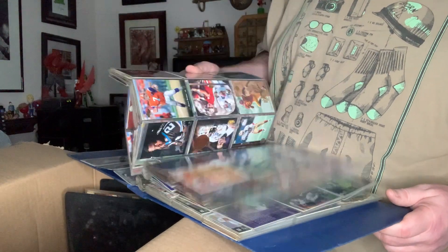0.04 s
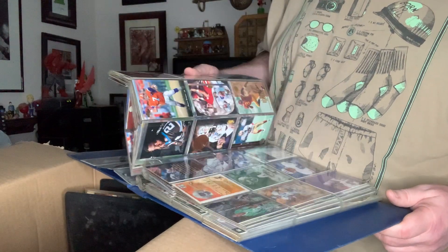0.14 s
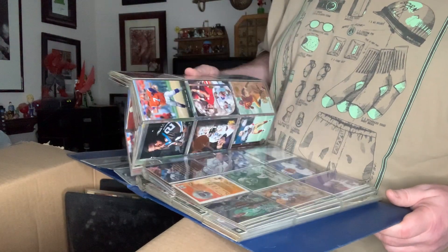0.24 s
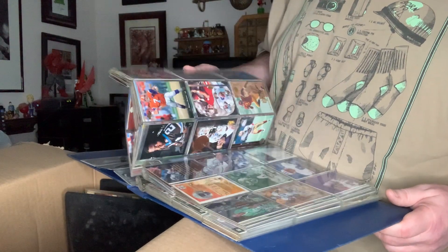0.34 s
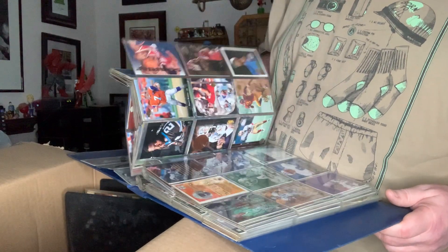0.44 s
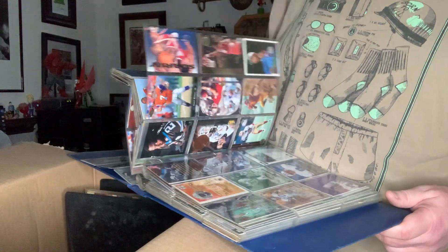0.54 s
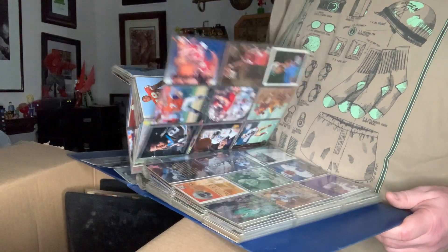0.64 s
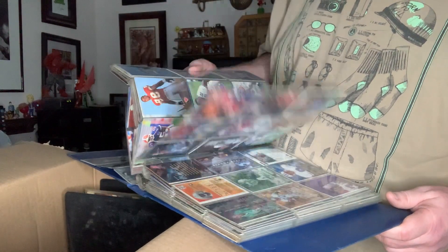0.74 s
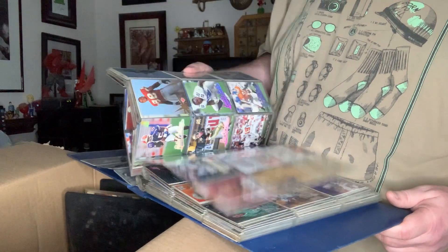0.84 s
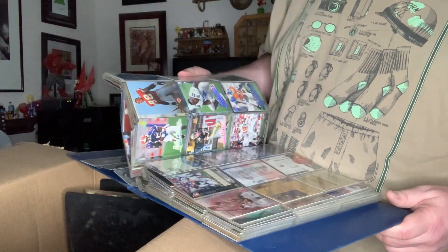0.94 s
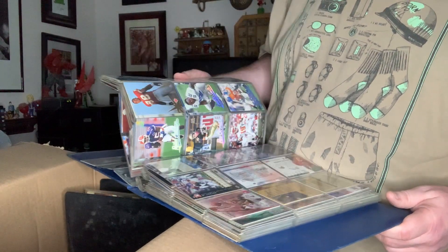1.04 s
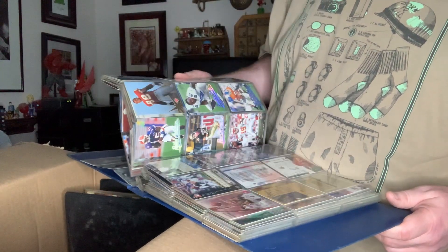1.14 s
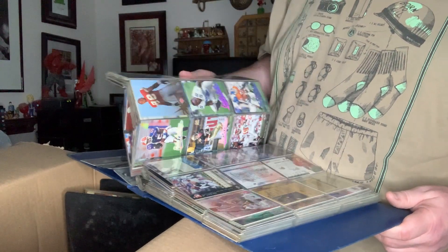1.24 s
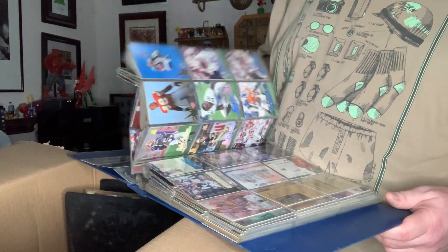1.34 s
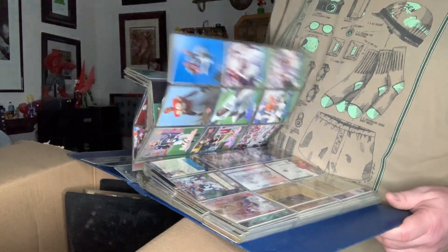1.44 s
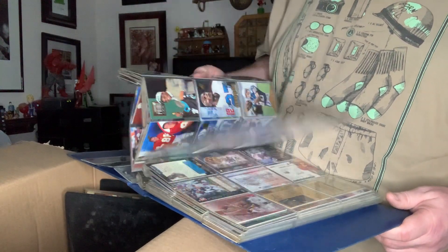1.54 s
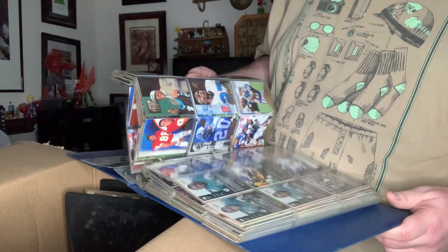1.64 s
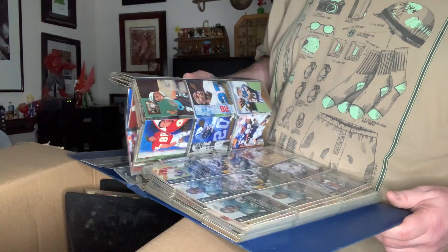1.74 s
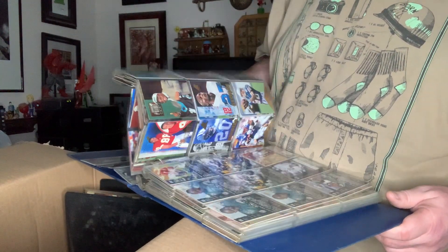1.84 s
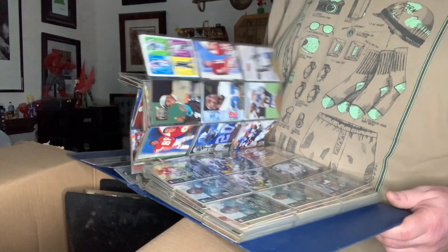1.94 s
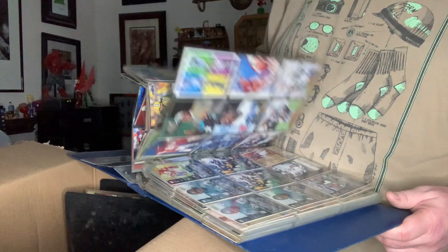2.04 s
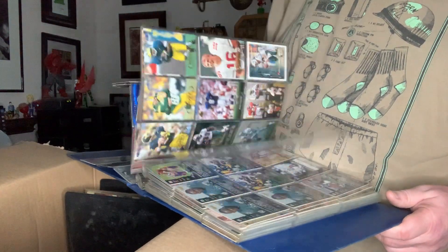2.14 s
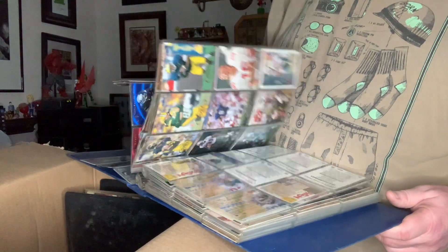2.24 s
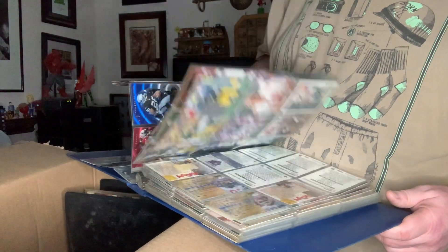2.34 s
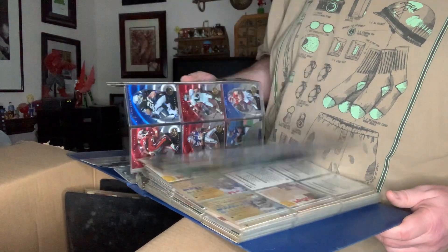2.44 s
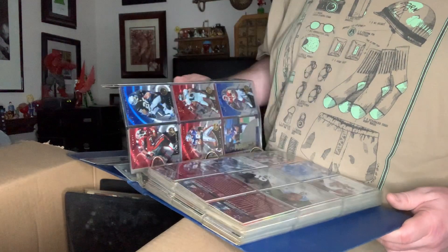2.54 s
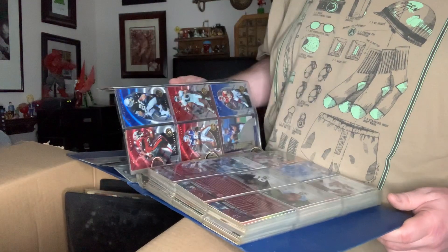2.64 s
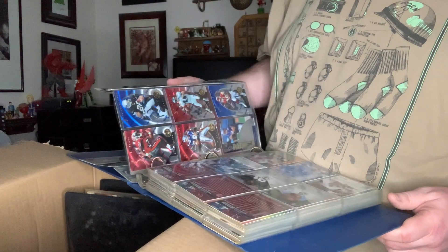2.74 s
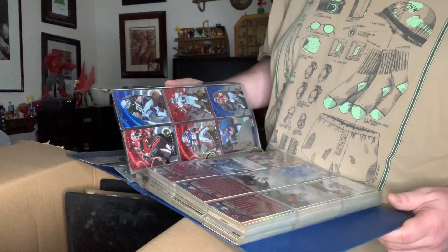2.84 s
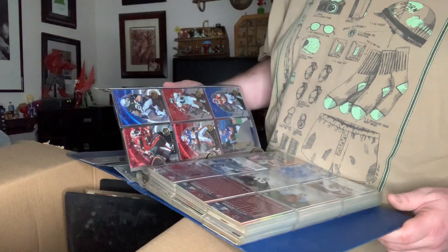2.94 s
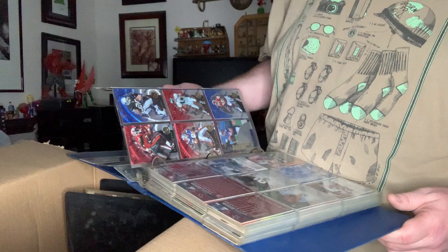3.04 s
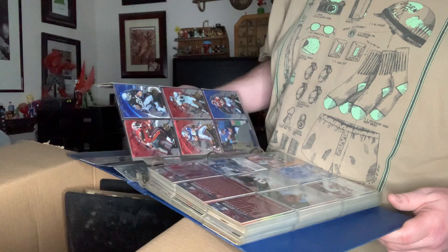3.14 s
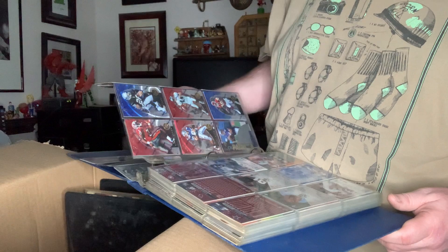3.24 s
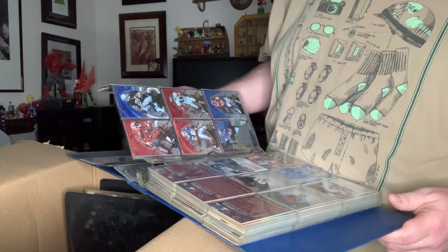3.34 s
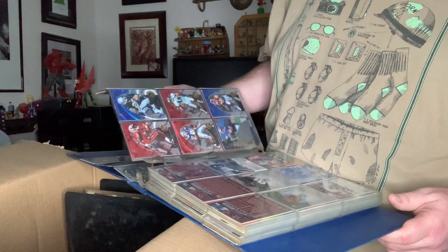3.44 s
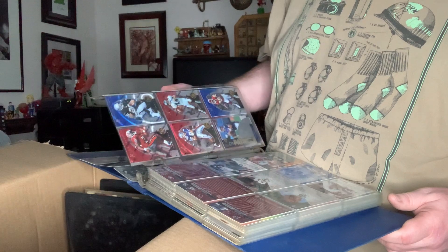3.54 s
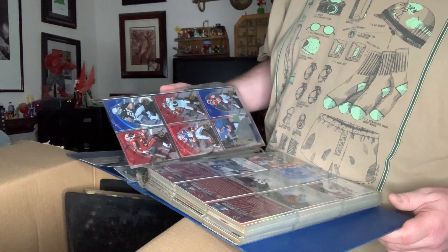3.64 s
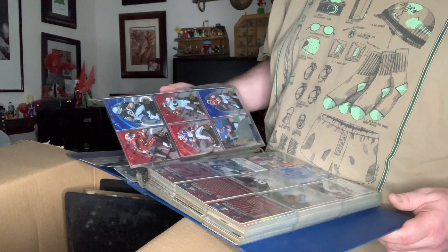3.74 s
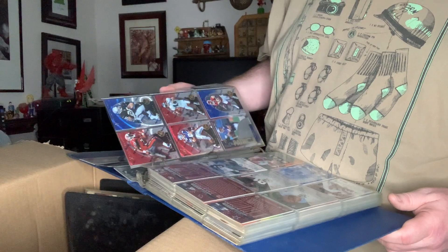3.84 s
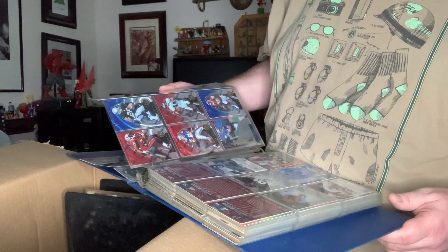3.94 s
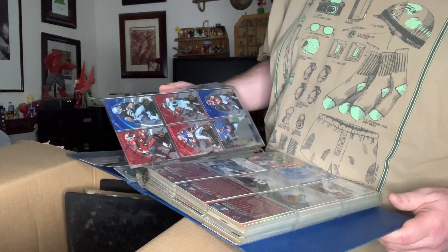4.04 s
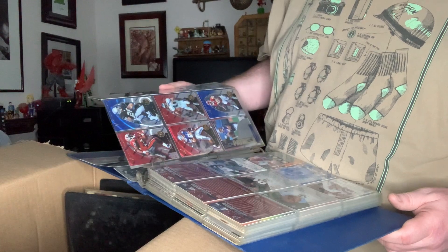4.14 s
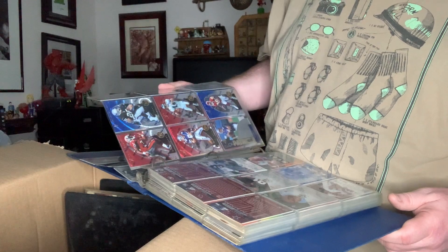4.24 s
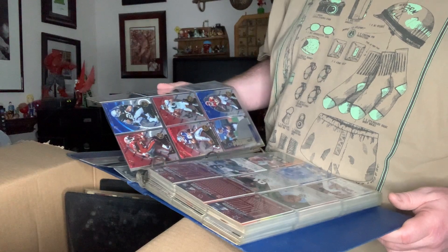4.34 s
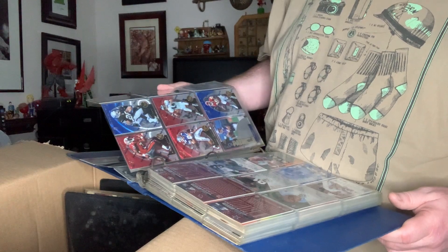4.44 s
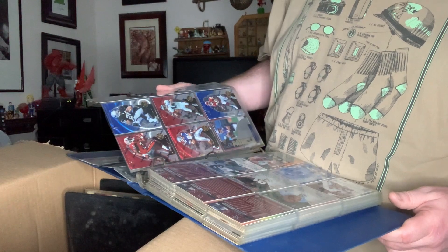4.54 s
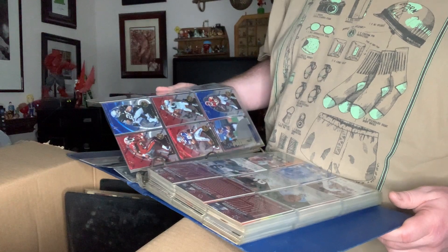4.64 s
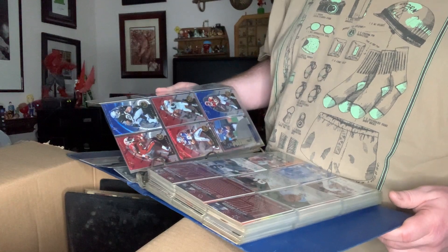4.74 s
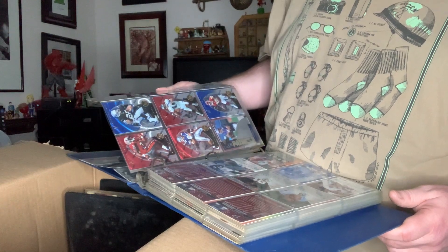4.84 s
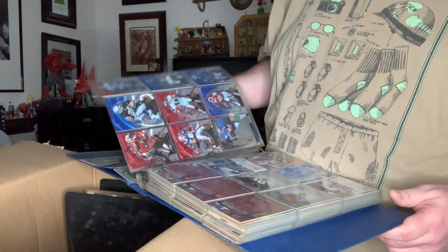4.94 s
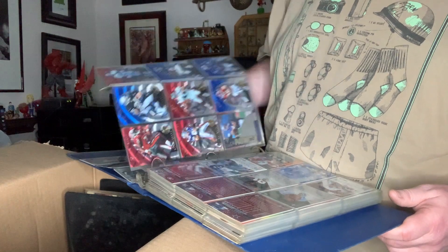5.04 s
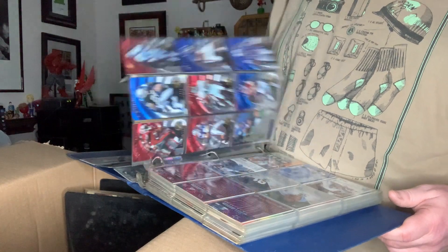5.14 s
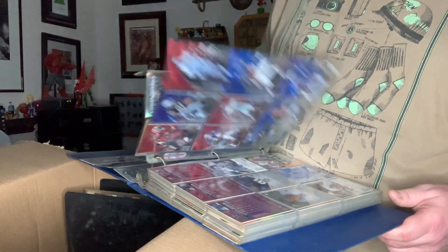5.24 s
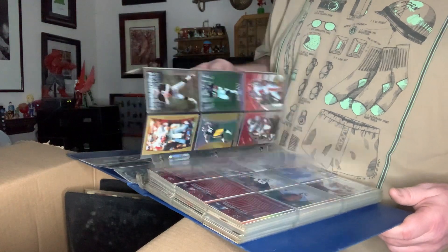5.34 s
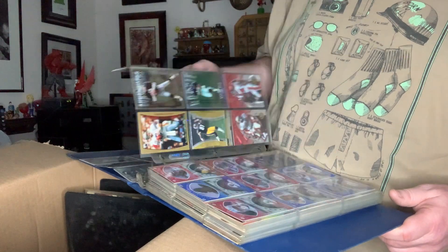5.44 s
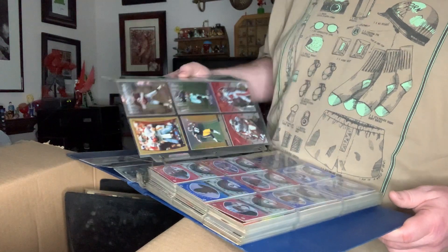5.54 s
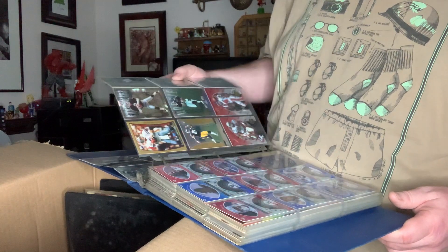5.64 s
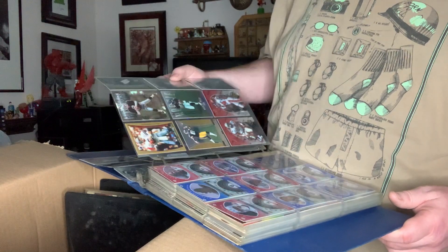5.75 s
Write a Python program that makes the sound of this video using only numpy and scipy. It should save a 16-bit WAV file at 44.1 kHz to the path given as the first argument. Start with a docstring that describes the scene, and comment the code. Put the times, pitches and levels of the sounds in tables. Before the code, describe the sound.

Close-up binder pages flipped in bursts: slippery plastic rustle, sharp card snaps, dull slaps, a quiet pause, then the hardest slap.

```python
"""A burst of sliding plastic and a hard card snap open the scene, then a soft slap and a puff of air.
Card-sleeve pages are being turned in a ring binder on a lap, in a small quiet room: stick-slip noise
rustles, struck modes snap, sinking sines slap, two wavering tones squeak and slow noise puffs.
A heavy slap comes near the end. Quick echoes, a short room tail and low house air lie around it.
A phone with two ports stands close by and gives the stereo picture."""
import sys
import numpy as np
from scipy import signal
from scipy.fft import rfft, irfft, next_fast_len
from scipy.io import wavfile
from scipy.ndimage import uniform_filter1d

SR = 44100
rng = np.random.default_rng(int(sys.argv[2]) if len(sys.argv) > 2 else 0)


def put_to_file(sound):
    """Save the sound as 16-bit audio at rate SR, in the file named by the first command-line argument."""
    columns = np.atleast_2d(sound).T  # one column per channel
    safe = np.clip(columns, -1, 1)
    whole_steps = np.round(safe * 32767)
    wavfile.write(sys.argv[1], SR, whole_steps.astype(np.int16))


N = 254898
TIME = np.arange(N) / SR
SIZE = next_fast_len(N + SR)  # room for tails beyond the end
FREQ = np.maximum(np.fft.rfftfreq(SIZE, 1 / SR), 1)

# A page is peeled up and slides ever harder: start t/s, length t/s, final rubbing level/dB,
# final crinkle level/dB
LIFTS = [(0.707, .14, -65.5, -77), (1.258, 0.38, -56, -54), (2.291, 0.23, -47, -49),
         (2.889, .19, -67.5, -72.5), (4.958, .41, -51, -50)]
# A page is gripped, bent or laid down: start t/s, hold t/s, rubbing level/dB, crinkle level/dB
FLEXES = [(0, 0.071, -39.5, -45), (0.063, .01, -39, -36.5), (0.342, 0.024, -68.5, -61),
          (0.396, 0.35, -70.5, -77.5), (0.846, 0.028, -46, -49.5), (.89, 0.13, -53, -69.5),
          (1.24, 0.085, -63, -70), (1.32, 0.02, -54, -50), (1.467, 0.038, -51.5, -80),
          (1.581, 0.089, -43, -42.5), (1.839, 0.28, -72, -69), (2.057, 0.039, -52, -56.5),
          (2.113, 0.03, -43, -44.5), (2.178, 0.093, -45.5, -43), (2.326, 0.014, -47, -58),
          (2.524, 0.083, -46, -51), (2.715, 0.12, -80, -72.5), (3.066, 0.017, -47.5, -47),
          (3.104, 0.097, -58.5, -64), (3.379, .125, -60.5, -55.5), (3.552, 0.053, -54, -52.5),
          (4.203, .025, -76.5, -66.5), (4.72, 0.137, -89.5, -80), (4.871, 0.1, -81, -68.5),
          (5.127, 0.072, -53, -51.5), (5.261, 0.011, -48, -48), (5.403, 0.034, -41.5, -51.5),
          (5.457, 0.3, -64.5, -74), (5.66, 0.043, -63, -75)]
LIFT_GROWTH_DB_PER_S = 41.5
ATTACK_S, SAG_DB_PER_S, RELEASE_DB_PER_S = 0.0082, 32, 328
# Hollow of the moving page, high when bent tight, low when slack: t/s, f/Hz
BEND = [(.05, 1710), (.45, 1625), (.87, 886), (1.6, 1426), (2.3, 1245), (2.6, 990), (3.1, 632),
        (3.57, 1244), (5.4, 1197)]
# Colour of sheets rubbing: f/Hz, level/dB
RUB_COLOUR = [(100, -10), (180, -2), (400, -7), (650, 0), (1000, -6.5), (1500, -4), (2100, -6),
              (2600, -17.5), (5000, -31.5)]
# Colour of the crinkling film: f/Hz, level/dB
CRINKLE_COLOUR = [(1000, -22.5), (2000, -5), (2700, 0), (3500, -0.5), (4700, 1), (6300, -1), (7600, -3.5),
                  (9000, 5), (10500, -15.5), (12000, 0), (15500, -2)]

# Cards and sleeve edges snapping or slapping down: t/s, card level/dB, crack level/dB
SNAPS = [(0.0533, -24.5, -24.5), (0.0808, -39, -39), (0.3503, -64, -60), (0.4507, -62.5, -79),
         (.8634, -42.5, -36.5), (.87, -41.5, -42), (1.381, -51.5, -48.5), (1.4065, -54.5, -53),
         (1.462, -46, -41.5), (1.5137, -46, -50.5), (1.6055, -40.5, -41.5), (1.9571, -62, -64.5),
         (2.1116, -44.5, -47), (2.1254, -50, -38), (2.2283, -39, -43), (2.3283, -46, -59),
         (2.341, -44, -42.5), (2.4625, -47, -38.5), (2.5088, -39.5, -40), (2.5133, -42, -31.5),
         (2.5579, -45, -50), (2.7222, -70, -60.5), (3.0744, -51, -52.5), (3.118, -50, -54),
         (3.4232, -42, -48), (5.0325, -61.5, -52.5), (5.1932, -48, -42.5), (5.344, -43.5, -48.5),
         (5.3737, -32.5, -35.5), (5.409, -20.5, -29.5), (5.693, -56.5, -67)]
# Colour of a crack: f/Hz, level/dB
CRACK_COLOUR = [(900, -21.5), (2000, -5), (4300, 8), (6500, -2), (9000, 6), (14000, -3.5), (16000, -5)]
# A row of cards lands one after another
PATTER_S, PATTER_GAP_S, PATTER_CARD_DB, PATTER_CRACK_DB = 2.596, 0.0097, -41, -67.5
# Stray ticks of a moving page, levels against its rubbing and crinkle
TICKS_PER_S, TICK_CARD_DB, TICK_CRACK_DB, TICK_SCATTER_DB = 22, -1, -3, 1

# Soft blows on the stack of pages: t/s, pitch f/Hz, 60 dB fade t/s, peak level/dB
THUDS = [(.085, 245, 0.07, -41.5), (0.872, 564, 0.037, -44.5), (2.523, 320, 0.014, -20.5),
         (2.529, 196, 0.058, -38), (3.075, 603, 0.076, -39), (3.088, 169, .08, -46),
         (3.42, 947, 0.024, -45), (3.437, 150, 0.07, -44.5), (5.381, 1196, 0.038, -31),
         (5.4097, 607, 0.0077, -15.5), (5.412, 216, 0.033, -31)]
# Smooth sleeves gliding over each other: crest t/s, crest to 1/e t/s, crest level/dB
GLIDES = [(.025, .035, -41.5), (0.477, 0.059, -70.5), (0.608, 0.075, -65), (.93, 0.079, -59.5),
          (2.24, 0.056, -55.5), (4.0, 0.033, -77)]
# Fingertips landing on a sleeve: t/s, level/dB
TOUCHES = [(1.857, -55), (2.07, -50.5), (3.554, -48), (4.091, -59.5), (4.2, -65)]
# A fingertip dragging on the sleeve: t/s, slip rate f/Hz, level/dB
SQUEAK = [(3.375, 2305, -71.5), (3.40, 2170, -52), (3.45, 2190, -62), (3.505, 2044, -53), (3.52, 2120, -61),
          (3.55, 2140, -77)]
# Air pushed out from under a moving page: crest t/s, crest to 1/e t/s, crest level/dB
PUFFS = [(.098, 0.037, -47), (1.655, 0.028, -54), (2.18, 0.038, -53.5), (2.543, 0.05, -58.5),
         (2.61, 0.071, -52.5), (5.476, 0.013, -42)]

# Colour of the room's tail: f/Hz, level/dB
ROOM_COLOUR = [(60, -1), (200, -3), (1500, -3.5), (4000, 4.5), (15000, -11)]
# Fade of the room's tail: f/Hz, 60 dB fade t/s
ROOM_DECAY = [(100, 0.35), (1200, 0.29), (4500, 0.34), (14000, 0.28)]
# Colour of the house air: f/Hz, level/dB
HUSH_COLOUR = [(45, -1.5), (140, 1.5), (250, -7.5), (450, -17.5), (1000, -24.5), (4600, -33.5), (7000, -34),
               (15500, -44)]
HUSH_DB = -67

# Right port against the left: f/Hz, level/dB
RIGHT_PORT = [(60, 4.5), (300, 4), (600, 3), (900, 1), (7800, -1.5), (8080, 13.5), (9000, -1)]
# Phase by which the left port trails (below zero it leads): f/Hz, phase/turns
LEFT_TRAIL = [(3400, 0), (5300, -.35), (6200, 0), (7200, .6), (8100, 1.02), (10600, 1.5), (12800, 2),
              (15500, 2.5)]
TOP_HZ = 15400


def effort(start_s, length_s, slope_db_per_s):
    """Gain of one move of the hand: quick attack, a hold that grows or sags, then release."""
    t = np.maximum(TIME - start_s, 0)
    hold_db = slope_db_per_s * np.minimum(t, length_s)
    release_db = RELEASE_DB_PER_S * np.clip(t - length_s, 0, .5)
    return np.minimum(t / ATTACK_S, 1) * undb(hold_db - release_db)


def handling():
    """Gains of rubbing and crinkle: lifts swell to their end, flexes start strong and relax."""
    power = 1e-12  # never quite zero, so its level in dB exists
    for start_s, length_s, *final_db in LIFTS:
        start_db = np.array(final_db) - LIFT_GROWTH_DB_PER_S * length_s
        power = power + np.outer(undb(start_db), effort(start_s, length_s, LIFT_GROWTH_DB_PER_S)) ** 2
    for start_s, hold_s, *start_db in FLEXES:
        power = power + np.outer(undb(start_db), effort(start_s, hold_s, -SAG_DB_PER_S)) ** 2
    return np.sqrt(power)


def rustle(rubbing, crinkle):
    """Sheets rub with the hollow sound of the cards inside; the thin film crinkles above."""
    load = catches(rate=150, fade_s=0.0076, depth_db=8.0)
    rub_slips = slips(rate=2500, scatter_db=0.5, width=.45)
    rub = sheet(rub_slips, RUB_COLOUR, load, np.geomspace(420, 2800, len(load)),
                steady=0.054, drift_db=3.5, hollow_db=3)
    film_slips = slips(rate=7000, scatter_db=2, width=0.93)
    film = sheet(film_slips, CRINKLE_COLOUR, load, np.geomspace(1800, 14000, len(load)),
                 steady=0.73, drift_db=6.0, hollow_db=0.5)
    return rub * rubbing + film * crinkle


def slips(rate, scatter_db, width):
    """Tiny stick-slip releases: many faint, a few sharp, each from its own spot on the sheet."""
    sizes = undb(scatter_db * np.minimum(rng.exponential(size=N), 4))  # no release is without bound
    struck = rng.random(N) < rate / SR
    train = unit(struck * sizes * rng.choice([-1, 1], N))
    return spread(train, train * rng.standard_normal(N), width)


def catches(rate, fade_s, depth_db, count=12):
    """Force on each patch of a sheet: sudden catches load the patches unequally, then let go."""
    at = np.flatnonzero(rng.random(N) < rate / SR)
    chance = rng.standard_normal((len(at), count + 1))
    kick_db = depth_db * (chance[:, :1] + chance[:, 1:])  # shared chance plus each patch's own
    kicks = np.zeros((count, N))
    kicks[:, at] = undb(np.clip(kick_db, -20, 10)).T ** 2
    load = signal.lfilter([1], [1, -np.exp(-1 / (fade_s * SR))], kicks)
    return load / load.mean(axis=1, keepdims=True)


def sheet(train, colour, load, centres_hz, steady, drift_db, hollow_db):
    """Slips sound through the resonances of a bending sheet, each swelling with its patch's load."""
    spectrum = rfft(train, SIZE) * undb(read(colour))
    place = np.interp(np.log(FREQ), np.log(centres_hz), np.arange(len(centres_hz)))
    hollow_hz, = curves(BEND)
    out = 0
    for k, hz in enumerate(centres_hz):
        overlap = np.maximum(1 - np.abs(place - k), 0)  # neighbouring bands crossfade
        band = irfft(spectrum * overlap, SIZE)[:, :N]
        hollow = np.exp(-(2 * np.log2(hz / hollow_hz)) ** 2)
        swell_db = drift_db * walk(35) + hollow_db * hollow
        out = out + band * np.sqrt(abs(steady) + load[k]) * undb(swell_db)
    return unit(out)


def releases(rubbing, crinkle, detune_octaves=.3, count=3):
    """Rows (s, Hz, card dB, crack dB) of snaps, patter and ticks; pitch follows the page's bend."""
    hollow_hz, = curves(BEND)
    patter = [(PATTER_S + k * PATTER_GAP_S, PATTER_CARD_DB, PATTER_CRACK_DB) for k in range(count)]
    rows = [(s, hollow_hz[int(s * SR)], card_db, crack_db) for s, card_db, crack_db in SNAPS + patter]
    draw = rng.random(N)
    detune, size = rng.standard_normal((2, N))
    for i in np.flatnonzero(draw < TICKS_PER_S / SR):
        motion_db = 20 * np.log10([rubbing[i], crinkle[i]])
        card_db, crack_db = motion_db + TICK_SCATTER_DB * size[i]
        hz = hollow_hz[i] * 2 ** (detune_octaves * detune[i])
        rows.append((i / SR, hz, card_db + TICK_CARD_DB, crack_db + TICK_CRACK_DB))
    return rows


def snaps(rows, card_q=3.2, ring_q=14, ring_db=-4, overtone=1.62, overtone_db=-3, bend_s=0.00057,
          crack_s=.0006, creak_s=0.0068, creak_db=-18, scatter=2.4, width=0.21, size=2048):
    """The film creaks, lets go with a crack, and a bending wave rings two modes of the card."""
    lead_s, span_s = .008, .004  # creak ahead of the snap; span over which its rms level counts
    out = np.zeros((2, N))
    t = np.arange(size) / SR - lead_s
    freq = np.maximum(np.fft.rfftfreq(size, 1 / SR), 1)
    # bending waves are slower in the bass
    delay_turns = freq * (lead_s - bend_s) + 2 * bend_s * np.sqrt(freq * 1e3)
    travel = np.exp(-2j * np.pi * delay_turns)
    creak = undb(creak_db) * np.exp(-np.abs(t) / creak_s)
    shape = np.where(t < 0, creak, np.exp(-np.abs(t) / crack_s))
    tick = unit(signal.unit_impulse(size, int(lead_s * SR) + 1))
    for s, hz, card_db, crack_db in rows:
        modes = resonance(hz, card_q, freq)
        modes = modes + undb(overtone_db) * resonance(overtone * hz, 2 * card_q, freq)
        modes = modes + undb(ring_db) * resonance(hz, ring_q, freq)  # the card's free part rings on
        card = irfft(modes / (1 + 1j * freq / (2 * hz)) ** 2 * travel)
        noise = spread(*rng.standard_normal((2, size)) * shape, width)
        burst = scatter * unit(noise) + tick
        crack = irfft(rfft(burst) * undb(read(CRACK_COLOUR, freq)))
        snap = unit(card) * undb(card_db) + unit(crack) * undb(crack_db)
        add(out, s - lead_s, snap * np.sqrt(span_s * SR / size))
    return out


def thuds(rise_s, sag):
    """The stack gives under a blow and rings for a few cycles, sinking in pitch."""
    out = np.zeros(N)
    t = np.arange(SR // 4) / SR
    for s, hz, t60, db in THUDS:
        fade = undb(-60 * t / t60)
        phase = np.cumsum(hz * (1 + sag * (fade - .5))) / SR
        ring = np.sin(2 * np.pi * phase) * fade * (1 - np.exp(-t / rise_s))
        add(out, s, ring / np.abs(ring).max() * undb(db))
    return out


def glides(centre_hz=3500, q=.8):
    """Plastic sliding without catching gives an airy hiss."""
    hiss = spread(*rng.standard_normal((2, N)), 0.17)
    return unit(filtered(hiss, resonance(centre_hz, q) ** 2)) * swells(GLIDES)


def touches(card_hz=1170, upper_hz=2020, q=7, fade_s=0.0092, film_db=-4):
    """A soft fingertip crushes the film for a moment and makes the card inside buzz."""
    press = sum(undb(db) * (TIME >= s) * np.exp(-np.abs(TIME - s) / fade_s) for s, db in TOUCHES)
    grit = spread(*rng.standard_normal((2, N)), 0.63)
    card = unit(filtered(grit, resonance(card_hz, q) + resonance(upper_hz, q) / 2))
    film = unit(filtered(grit, undb(read(CRINKLE_COLOUR))))
    return (card + undb(film_db) * film) * press


def squeak(jitter=0.16, wander=.09, upper_ratio=1.42, upper_db=-6):
    """Uneven slips under the fingertip sing in two rough bands."""
    hz, db = curves(SQUEAK)

    def band(ratio):
        """One tone with its own uneven pitch."""
        uneven = 1 + jitter * walk(900) + wander * walk(70)
        return np.sin(2 * np.pi * np.cumsum(hz * ratio * uneven) / SR)

    tones = band(1) + undb(upper_db) * band(upper_ratio)
    touching = (TIME > SQUEAK[0][0]) & (TIME < SQUEAK[-1][0])
    return unit(tones * undb(3.85 * walk(250))) * undb(db) * touching


def puffs(centre_hz=77, q=5.0):
    """The cushion of air under a page wobbles slowly as it is squeezed out."""
    wobble = filtered(rng.standard_normal(N), resonance(centre_hz, q))
    even_wobble = np.cos(np.angle(signal.hilbert(wobble)))  # keeps the phase, levels the strength
    return swells(PUFFS) * unit(even_wobble)


def nearby(x, echo_db=-11, reach_s=0.0065, count=6):
    """Cover, chest and raised pages throw back quick echoes that shift as the pages move."""
    out = np.zeros((2, N))
    for delay_s in np.linspace(.15, 1, count) * reach_s:
        moving_delay = delay_s * (1 + 0.11 * walk(1.6))
        echo = np.interp(TIME - moving_delay, TIME, x.mean(axis=0), left=0)
        out += spread(echo, echo * rng.standard_normal(), 1.0)
    dulled = filtered(out, 1 / (1 + 1j * FREQ / 6000))
    return dulled * undb(echo_db) / np.sqrt(count)


def room(x, wet_db, build_s=0.0077, shared_hz=2200):
    """Walls and furniture return a short diffuse tail; the close ports share its low part."""
    t = np.arange(SR * 2 // 3) / SR
    freq = np.maximum(np.fft.rfftfreq(len(t), 1 / SR), 1)
    noise = rfft(rng.standard_normal((2, len(t))))
    noise = spread(*noise, np.clip(freq / shared_hz, .4, 1)) * undb(read(ROOM_COLOUR, freq))
    tail = 0
    for hz, t60 in ROOM_DECAY:
        share = read([(f, f == hz) for f, _ in ROOM_DECAY], freq)  # band around this row's pitch
        tail = tail + irfft(noise * share, len(t)) * np.exp(-np.log(1000) * t / t60)
    build = 1 - np.exp(-(t / build_s) ** 2)
    scale = np.sqrt(2 * np.log(1000) / (ROOM_DECAY[1][1] * SR))  # evens out the tail's energy
    return undb(wet_db) * filtered(x.mean(axis=0), rfft(tail * build * scale, SIZE))


def hush():
    """The low, steady air of the house, with a faint hiss on top."""
    air = spread(*rfft(rng.standard_normal((2, SIZE))), np.clip(FREQ / 600, .25, 1))
    coloured = irfft(air * undb(read(HUSH_COLOUR)), SIZE)[:, :N]
    return unit(coloured) * undb(HUSH_DB + 0.43 * walk(5))


def undb(db):
    """Decibels to gain."""
    return 10 ** (np.asarray(db) / 20)


def unit(x):
    """Scale to rms 1."""
    return x / np.sqrt(np.mean(x ** 2))


def read(points, freq=FREQ):
    """Join (Hz, value) points on a log-frequency axis."""
    hz, value = np.transpose(points)
    return np.interp(np.log(freq), np.log(hz), value)


def curves(table):
    """Each column of a timed table at every sample."""
    s, *columns = np.transpose(table)
    return [np.interp(TIME, s, column) for column in columns]


def swells(table):
    """Soft humps of level from rows of (crest s, crest to 1/e s, dB)."""
    return sum(undb(db) * np.exp(-((TIME - s) / half) ** 2) for s, half, db in table)


def filtered(x, response):
    """Apply a frequency response."""
    return irfft(rfft(x, SIZE) * response, SIZE)[..., :N]


def resonance(hz, q, freq=FREQ):
    """Response of one damped mode, gain 1 at its centre."""
    return 1 / (1 + 1j * q * (freq / hz - hz / freq))


def walk(rate):
    """Smooth chance about zero, with a fresh aim about rate times a second."""
    k = max(int(SR / rate), 1)
    steps = np.repeat(rng.standard_normal(N // k + 1), k)
    return 0.5 * uniform_filter1d(steps, k)[:N]


def add(track, s, sound):
    """Mix a sound into a track at time s."""
    i = max(int(s * SR), 0)
    track[..., i:i + sound.shape[-1]] += sound[..., :N - i]


def spread(mid, side, width):
    """Left and right from a shared and an opposed part."""
    return (mid + width * side * np.array([[1], [-1]])) / np.sqrt(1 + width ** 2)


def scene():
    """The binder, its surroundings and the quiet behind it."""
    rubbing, crinkle = handling()
    binder = rustle(rubbing, crinkle) + snaps(releases(rubbing, crinkle))
    binder = binder + thuds(rise_s=0.00026, sag=0.13) + glides() + touches() + squeak() + puffs()
    return binder + nearby(binder) + room(binder, wet_db=-8.0) + hush()


def record(dry):
    """The right port has more bass, a peak near 8 kHz and mostly earlier treble; both ends are cut."""
    tilt = undb(read(RIGHT_PORT))
    trail = np.exp(-2j * np.pi * np.interp(FREQ, *np.transpose(LEFT_TRAIL)))
    balance = np.where(FREQ < 1000, np.sqrt(2 / (1 + tilt ** 2)), 1)  # keeps the bass power of the pair
    low_cut = 1 / np.sqrt(1 + (42 / FREQ) ** 10)
    ports = filtered(dry, np.array([balance * trail, balance * tilt]) * low_cut)
    top_cut = signal.ellip(8, .2, 70, TOP_HZ, fs=SR, output="sos")
    return signal.sosfilt(top_cut, ports)


dry = scene()
out = record(dry)
put_to_file(out)
```